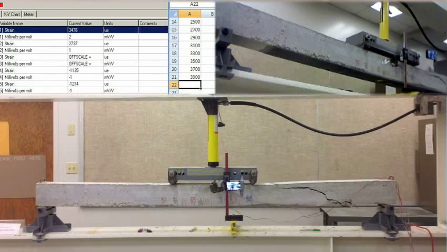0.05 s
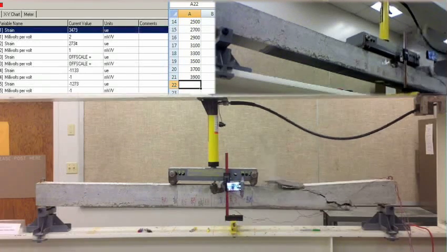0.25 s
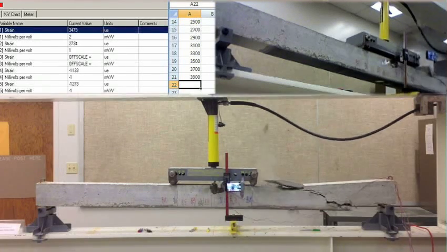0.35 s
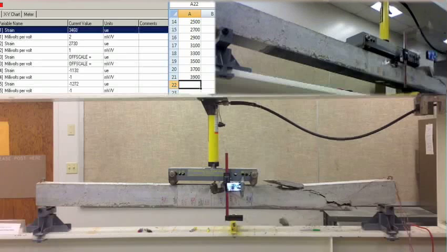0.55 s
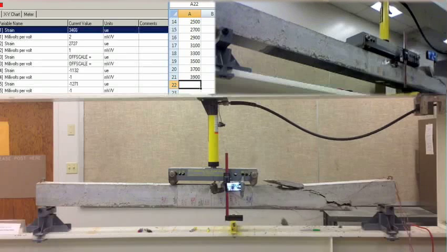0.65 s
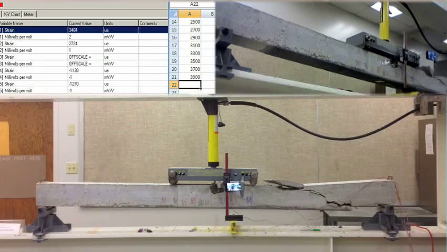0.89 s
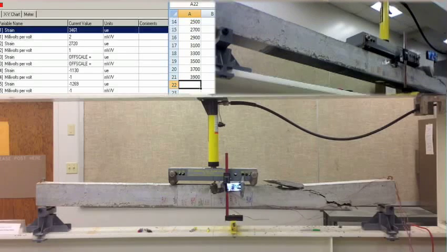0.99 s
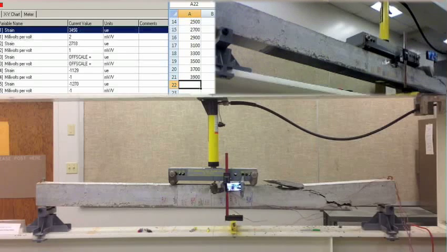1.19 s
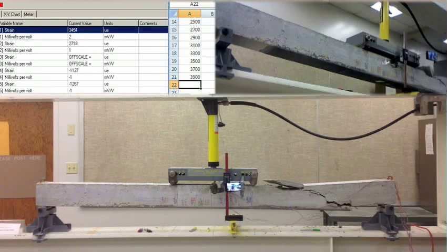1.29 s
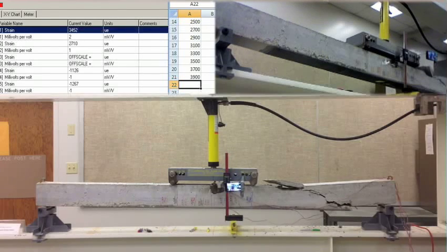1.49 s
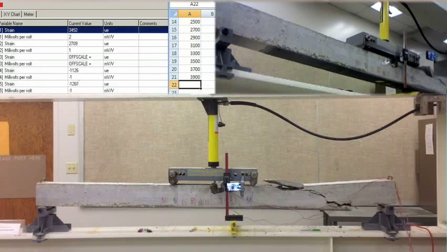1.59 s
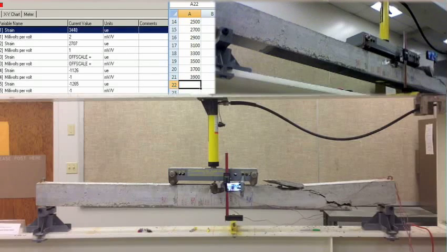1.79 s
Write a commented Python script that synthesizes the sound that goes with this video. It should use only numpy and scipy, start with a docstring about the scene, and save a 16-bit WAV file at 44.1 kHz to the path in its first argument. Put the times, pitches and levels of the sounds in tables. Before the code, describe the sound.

Concrete cracks loudly and drops, followed by a low steel ring and skittering fragments.

```python
"""A hard-walled lab: a concrete beam snaps in a loading rig while an earlier crack is still dying away.
Bright cracks give way to heavy thuds as the beam drops and settles; the steel rig clanks and rings on.
Chips and flakes land and skitter about, and fine grit trickles, over the hum of ventilation and machines.
Each blow is a burst of grainy noise plus the room's echo; the long rings are decaying sines.
One microphone hears it all, slightly overloaded by the bang."""
import sys
import numpy as np
from scipy import signal
from scipy.io import wavfile

SR = 44100
rng = np.random.default_rng(int(sys.argv[2]) if len(sys.argv) > 2 else 0)


def output_pcm(signal):
    """Save a mono or channel-first signal as 16-bit PCM at the path in sys.argv[1].

    Samples are clipped to [-1, 1] before scaling.
    """
    pcm = np.clip(np.atleast_2d(signal).T, -1, 1) * 32767
    wavfile.write(sys.argv[1], SR, np.round(pcm).astype(np.int16))


N = 81585
TIME = np.arange(N) / SR
BAND_EDGES_HZ = np.geomspace(25, 18000, 21)
BAND_CENTRES_HZ = np.sqrt(BAND_EDGES_HZ[1:] * BAND_EDGES_HZ[:-1])
HEAVY_CONTACT_S, LIGHT_CONTACT_S = .0015, .002


# The snap: start_s, level_db, direct_vs_room_db
CRACK_HITS = [(0.2209, -11, -7), (.2280, -11.5, -5), (.258, -17.5, -9)]
# Its mid-heavy, bright-topped tone: frequency_hz, relative_db
CRACK_TONE = [(40, -37), (70, -30), (110, -25.5), (170, -7.5), (300, 3.5), (700, 3), (1500, -1.5),
              (3000, -12.5), (6500, -12.5), (10000, -18), (16000, -19.5)]
def cracks(echo):
    """The concrete splits in a quick run of hard, bright blows."""
    tone_db = at_bands(CRACK_TONE)
    return sum(heavy_blow(echo, start_s, level_db, direct_db, tone_db)
               for start_s, level_db, direct_db in CRACK_HITS)


# The weight; negative starts leave only the earlier crack's tail: start_s, level_db, tilt_db_per_octave
THUD_HITS = [(-.13, -26, 4), (-.01, -28.5, -13), (.250, -13.5, 1), (.288, -10, -.5), (.316, -13, -3.5),
             (.367, -15, 0.5), (.505, -20.5, 1), (.525, -22, 3), (0.576, -25, 3.5), (.64, -29, 5)]
# Their dull, boomy tone: frequency_hz, relative_db
THUD_TONE = [(35, -45), (65, -50), (100, -16.5), (200, -1), (320, -6.5), (600, -8.5), (1300, -19),
             (3000, -33.5), (7000, -50), (16000, -63)]
def thuds(echo, tilt_above_hz=308, direct_db=-13):
    """The beam drops on its supports and settles, each thud with its own treble tilt."""
    octaves = np.log2(np.maximum(BAND_CENTRES_HZ / tilt_above_hz, 1))
    return sum(heavy_blow(echo, start_s, level_db, direct_db, at_bands(THUD_TONE) + tilt * octaves)
               for start_s, level_db, tilt in THUD_HITS)


# The body of the beam: pitch_hz, relative_db
BEAM_MODES = [(207, -20), (250, -31), (298, -18.5), (365, -20), (438, -26), (486, -22.5), (507, -28),
              (649, -30.5), (684, -24.5), (834, -32), (909, -29.5), (939, -41), (1030, -59), (1195, -26)]
def beam_ring(gain_db=4, t60_s=1.17):
    """The beam rings on its supports, all its modes fading together."""
    modes = [(pitch_hz, relative_db + gain_db, t60_s) for pitch_hz, relative_db in BEAM_MODES]
    return ringing(modes, start_s=.25, swell_s=.023)


# The long steel tail: pitch_hz, level_db, t60_s
RIG_MODES = [(102.4, -34, 2.0), (178, -29, 3.24), (260.5, -16.5, 3.89), (318.2, -36.5, 6.36),
             (399, -34.5, 3.14), (470, -44, 5), (569, -38, 1.3)]
def rig_ring():
    """Freed of its load, the steel rig blooms into a low, lasting ring."""
    return ringing(RIG_MODES, start_s=.24, swell_s=.12)


# The clanks: start_s, level_db
CLANK_HITS = [(0.23, -22.5), (0.513, -30)]
# Their metallic colour: pitch_hz, width_hz, relative_db
FITTING_RESONANCES = [(1220, 110, 0), (1480, 90, -2), (2430, 50, 0), (4410, 50, -15), (5000, 60, -16),
                      (6300, 200, -11), (8400, 70, -17), (9900, 130, -18)]
def fitting_clanks(echo):
    """The rig's bolted steel fittings clank in narrow resonances."""
    return struck_object(echo, CLANK_HITS, FITTING_RESONANCES, direct_db=-12.5)


# The scatter of chips, led by a faint tick of cracking just before the snap: start_s, level_db, low_hz,
# high_hz, crumble_s, direct_vs_room_db
CHIP_LANDINGS = [ (0.171, -58.5, 2500, 16400, 0.0036, -6), (.442, -48.5, 5000, 14000, .01, -5),
                 (.476, -56, 4150, 13150, 0.021, 5), (.519, -57, 7100, 16090, .004, 9),
                 (.543, -47.5, 2972, 14100, .003, -3), (0.593, -45, 3520, 7600, .008, -19),
                 (0.644, -36.5, 4900, 14500, 0.0036, -2.5), (0.681, -41, 3760, 10400, 0.013, 0),
                 (.760, -48.5, 5000, 13900, 0.0042, 0), (0.817, -47.5, 9600, 16200, 0.018, -8),
                 (0.859, -46.5, 2820, 7140, 0.0016, -5.5), (.954, -34, 1887, 3970, 0.003, -19),
                 (.963, -24.5, 2400, 7500, 0.0099, -13), (.966, -40.5, 537, 880, 0.0054, -7),
                 (0.973, -37, 6100, 13900, 0.041, 4.5), (1.014, -34, 3000, 15000, 0.0061, -8),
                 (1.094, -33, 8100, 16200, 0.0064, -3), (1.100, -35.5, 2740, 8300, .02, -2.5),
                 (1.102, -47, 7000, 16000, .0006, 11), (1.115, -47.5, 520, 1370, 0.03, -1),
                 (1.159, -36, 9100, 14500, 0.011, 0.5), (1.243, -35.5, 1760, 5800, 0.0071, -6),
                 (1.2460, -34, 9700, 17600, 0.00049, 5), (1.327, -44.5, 9150, 15640, 0.007, 1.5),
                 (1.419, -46.5, 1500, 6170, 0.0027, -3), (1.421, -41.5, 354, 1940, 0.026, -9.5),
                 (1.485, -59.5, 8640, 13900, 0.0034, 4), (1.547, -56, 9300, 9740, 0.0045, 1.5),
                 (1.563, -51.5, 3670, 7960, 0.0058, -2.5), (1.709, -55.5, 7100, 16800, .002, -1),
                 (1.776, -54, 2950, 14200, 0.0055, -4)]
def chips(echo):
    """A faint crack ticks just before the snap; after it, each piece of concrete crumbles on landing and sounds
    in a range set by its size."""
    track = np.zeros(N)
    for start_s, level_db, low_hz, high_hz, crumble_s, direct_db in CHIP_LANDINGS:
        direct = band_pass(crumble(crumble_s), low_hz, high_hz)
        room = band_pass(echo(crumble_s).sum(axis=0), low_hz, high_hz)
        track += place(start_s, level_db, direct_db, direct, room)
    return track


# The slap: start_s, level_db
FLAKE_SLAPS = [(0.966, -31)]
# Its brittle colour: pitch_hz, width_hz, relative_db
FLAKE_RESONANCES = [(3140, 110, -15), (4370, 750, -2.5), (7020, 250, 0.5)]
def flake_slap(echo):
    """A large flake slaps down and resonates briefly."""
    return struck_object(echo, FLAKE_SLAPS, FLAKE_RESONANCES, direct_db=-8)


# A quick, close flurry of clinks: start_s, level_db
SHARD_CLINKS = [(1.209, -46.5), (1.215, -37), (1.229, -36), (1.24, -41)]
# Their thin ring: pitch_hz, width_hz, relative_db
SHARD_RESONANCES = [(2620, 110, -8), (2790, 100, 0), (3230, 120, -13), (3490, 130, -13)]
def rocking_shard(echo):
    """A shard rocks to rest, clinking at each contact."""
    return struck_object(echo, SHARD_CLINKS, SHARD_RESONANCES, direct_db=.5)


def grit(echo, start_s=.35, rise_s=.52, peak_grains_per_s=490, level_db=-54, room_db=3.5):
    """A thin stream of sand grains trickles from the break, swells and runs out."""
    progress = (np.maximum(TIME - start_s, 0) / rise_s) ** 2
    grains_per_s = peak_grains_per_s * progress * np.exp(1 - progress)
    falls = rng.random(N) < grains_per_s / SR
    grains = falls * rng.standard_normal(N)
    room = signal.fftconvolve(grains, unit_energy(echo(LIGHT_CONTACT_S).sum(axis=0)))[:N]
    trickle = band_pass(grains + from_db(room_db) * room, low_hz=4900, high_hz=16500)
    return from_db(level_db) * np.sqrt(N) * unit_energy(trickle)


# The room's tail, longest in the bass: frequency_hz, t60_s
LAB_DECAY = [(60, 3.28), (180, 1.28), (400, 1.015), (900, 0.95), (2000, 0.69), (4000, 0.56), (8000, 0.42),
             (15000, 0.31)]
def lab_reverb():
    """The hard walls' echo by band: different for each spot, slower to build for a longer contact."""
    bands = noise_bands()
    decay = np.array([fade(t60_s) for t60_s in at_bands(LAB_DECAY)])
    def echo(contact_s, build_s=.00067):
        attack = 1 - np.exp(-TIME / (build_s + contact_s))
        return np.roll(bands, -rng.integers(N // 2), axis=1) * decay * attack
    return echo


# The room tone: frequency_hz, relative_db
HUM_TONE = [(30, -47), (70, -13), (150, 9), (350, 4.5), (800, -9), (2000, -11), (6000, -19.5), (15000, -20)]
def ventilation_hum(level_db=-50):
    """Ventilation and machines lay down a steady bed of low noise."""
    noise = from_db(at_bands(HUM_TONE)) @ noise_bands()
    return from_db(level_db) * np.sqrt(N) * unit_energy(noise)


def heavy_blow(echo, start_s, level_db, direct_db, tone_db):
    """A short burst of force, coloured by the beam, and the room's answer."""
    gains = from_db(tone_db)
    force = crumble(HEAVY_CONTACT_S)[:SR // 4]
    direct = sum(gain * band_pass(force, low_hz, high_hz)
                 for gain, low_hz, high_hz in zip(gains, BAND_EDGES_HZ, BAND_EDGES_HZ[1:]))
    direct = np.pad(direct, (0, N - len(direct)))
    return place(start_s, level_db, direct_db, direct, room=gains @ echo(HEAVY_CONTACT_S))


def ringing(modes, start_s, swell_s):
    """Modes that swell as the load is let go, then die away."""
    rings = sum(from_db(level_db) * fade(t60_s) * np.sin(2 * np.pi * (pitch_hz * TIME + rng.random()))
                for pitch_hz, level_db, t60_s in modes)
    swell = 1 - np.exp(-TIME / swell_s)
    return np.pad(rings * swell, (int(start_s * SR), 0))[:N]


def struck_object(echo, hits, resonances, direct_db):
    """Short contacts set an object's resonances ringing in the room."""
    def body(x):
        return sum(from_db(db) * band_pass(x, hz - width / 2, hz + width / 2)
                   for hz, width, db in resonances)
    track = np.zeros(N)
    for start_s, level_db in hits:
        direct = body(crumble(LIGHT_CONTACT_S))
        room = body(echo(LIGHT_CONTACT_S).sum(axis=0))
        track += place(start_s, level_db, direct_db, direct, room)
    return track


def crumble(crumble_s, spread_db=2.6, rise_share=.31):
    """A spray of uneven grains that builds up and dies away."""
    grains = rng.standard_normal(N) * from_db(spread_db * np.minimum(rng.exponential(1, N), 4))
    age = np.minimum(TIME / crumble_s, 40)
    return grains * np.exp(-age) * (1 - np.exp(-age / rise_share))


def place(start_s, level_db, direct_db, direct, room, window_s=.04):
    """Cue a hit and its echo; the echo carries the energy of level_db held for window_s."""
    blend = from_db(direct_db) * unit_energy(direct) + unit_energy(room)
    hit = from_db(level_db) * np.sqrt(window_s * SR) * blend
    offset = N - round(start_s * SR)
    return np.pad(hit, N)[offset:offset + N]


def noise_bands():
    """White noise split into half-octave bands, neighbours unrelated."""
    white = rng.standard_normal((2, N + SR))
    return np.array([band_pass(white[k % 2], BAND_EDGES_HZ[k], BAND_EDGES_HZ[k + 1])[SR:]
                     for k in range(len(BAND_CENTRES_HZ))])


def band_pass(x, low_hz, high_hz):
    """Causal band-pass, at least 2% wide."""
    high_hz = np.clip(high_hz, low_hz * 1.02, .45 * SR)
    return signal.sosfilt(signal.butter(2, [low_hz, high_hz], "band", fs=SR, output="sos"), x + 1e-18)


def at_bands(curve):
    """Read a frequency curve at the band centres."""
    hz, values = np.transpose(curve)
    return np.interp(np.log(BAND_CENTRES_HZ), np.log(hz), values)


def fade(t60_s):
    """Exponential decay, 60 dB down after t60_s."""
    return np.exp(-np.log(1000) * TIME / t60_s)


def from_db(db):
    """Decibels to gain."""
    return 10 ** (np.asarray(db) / 20)


def unit_energy(x):
    """Scale to an energy of one."""
    return x / np.sqrt(np.sum(x ** 2) + 1e-30)


def scene():
    """Every layer reaches one microphone, the same on both channels."""
    echo = lab_reverb()
    beam_and_rig = beam_ring() + rig_ring() + fitting_clanks(echo)
    bed = ventilation_hum()
    large_pieces = flake_slap(echo) + rocking_shard(echo)
    fracture = cracks(echo) + thuds(echo)
    small_pieces = chips(echo) + grit(echo)
    return np.tile(fracture + beam_and_rig + large_pieces + small_pieces + bed, (2, 1))


def record(dry, low_cut_hz=83, ceiling=.97, high_cut_hz=15900):
    """The microphone drops the deep bass; the loudest peaks are rounded and the top is cut."""
    thinned = signal.sosfilt(signal.butter(2, low_cut_hz, "high", fs=SR, output="sos"), dry)
    rounded = thinned / (1 + (thinned / ceiling) ** 6) ** (1 / 6)
    return signal.sosfilt(signal.ellip(10, .1, 80, high_cut_hz, fs=SR, output="sos"), rounded)


dry = scene()
out = record(dry)
output_pcm(out)
```